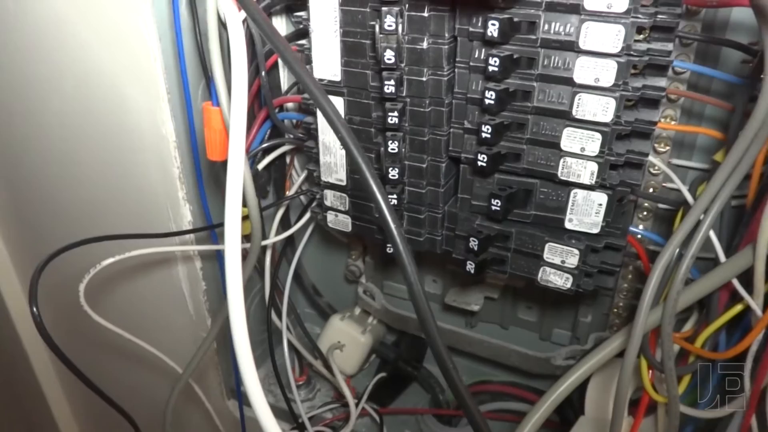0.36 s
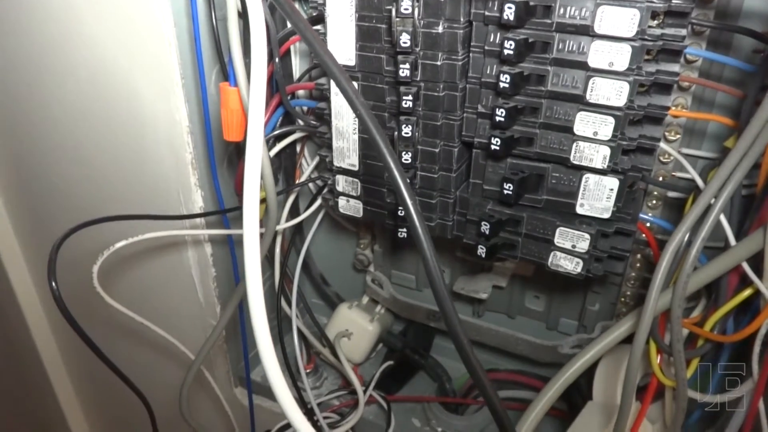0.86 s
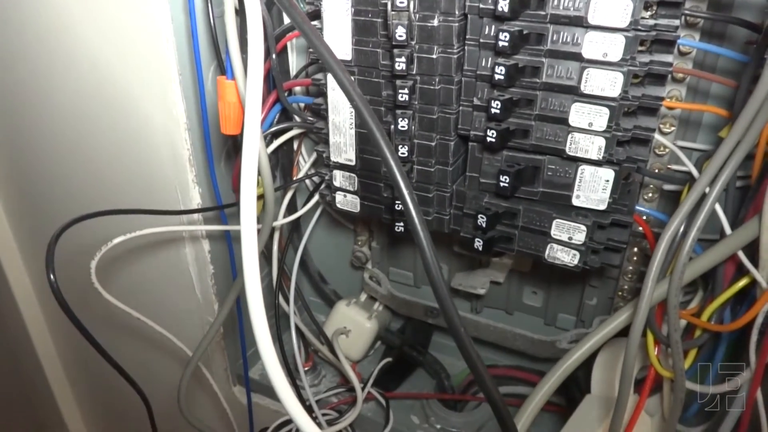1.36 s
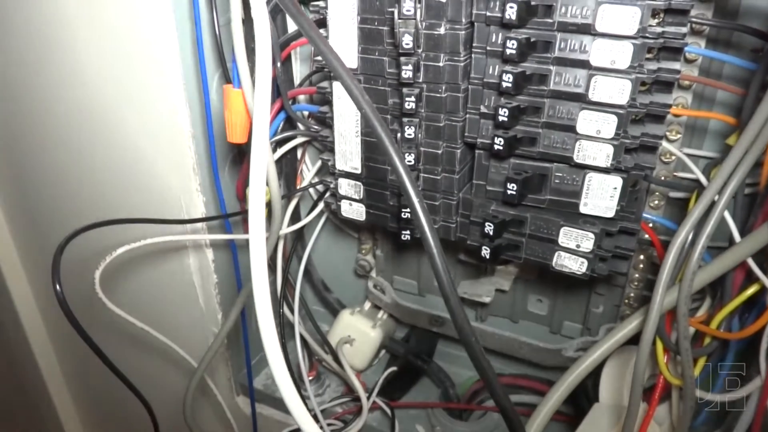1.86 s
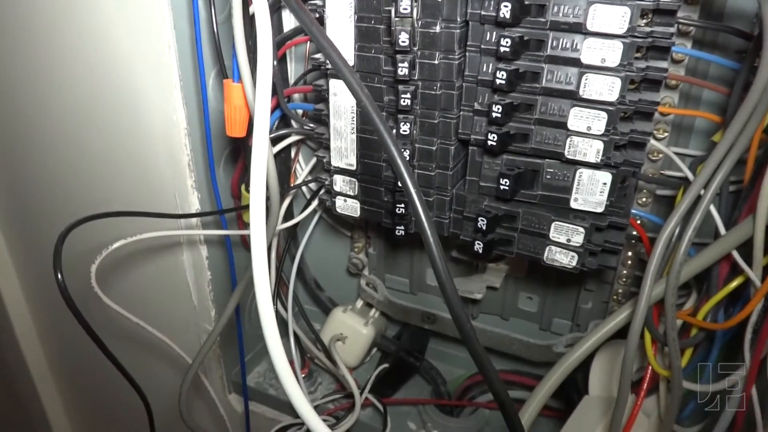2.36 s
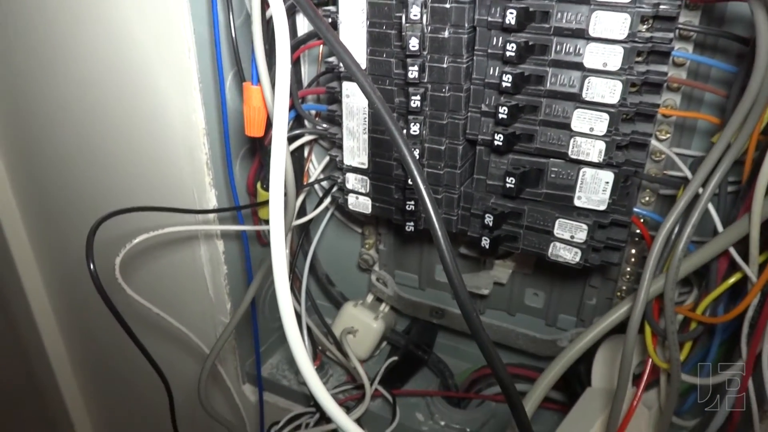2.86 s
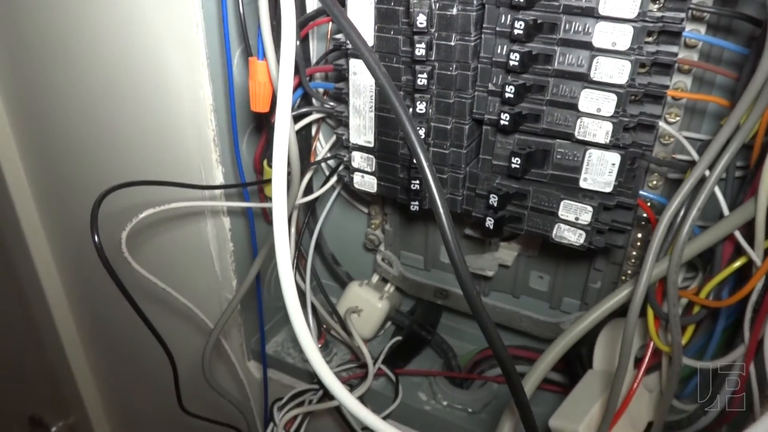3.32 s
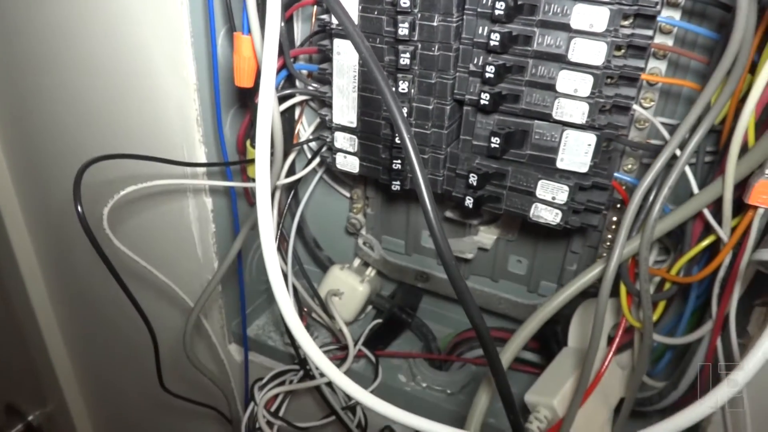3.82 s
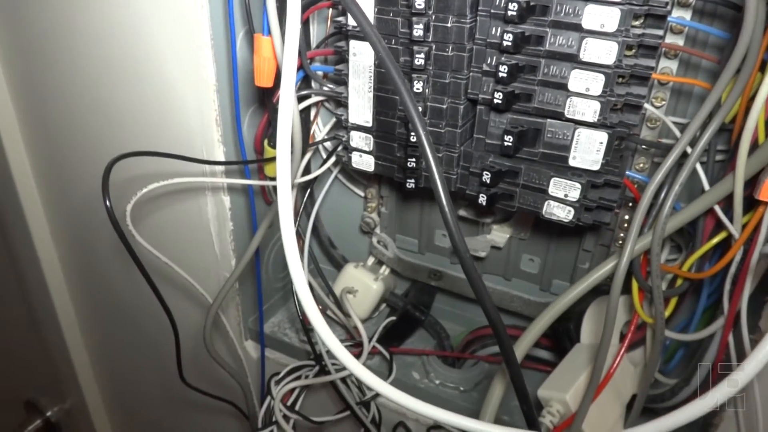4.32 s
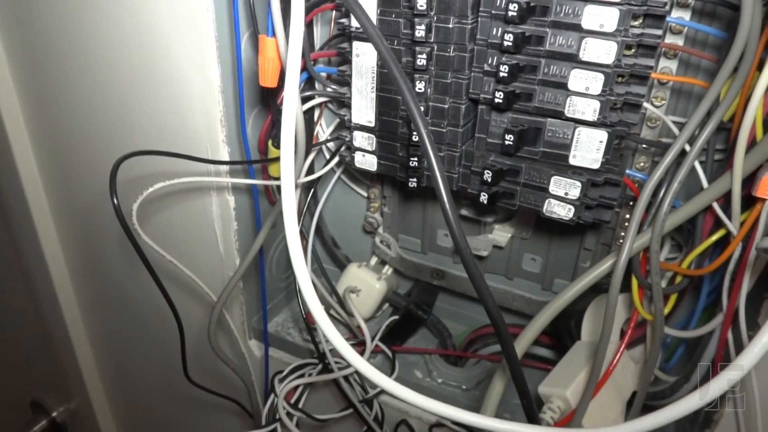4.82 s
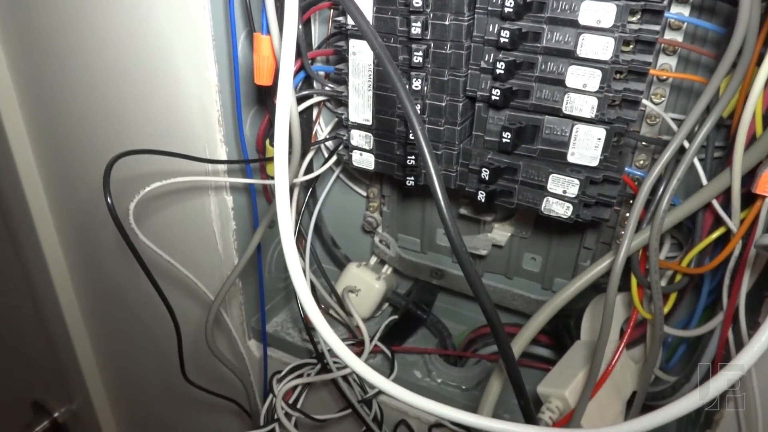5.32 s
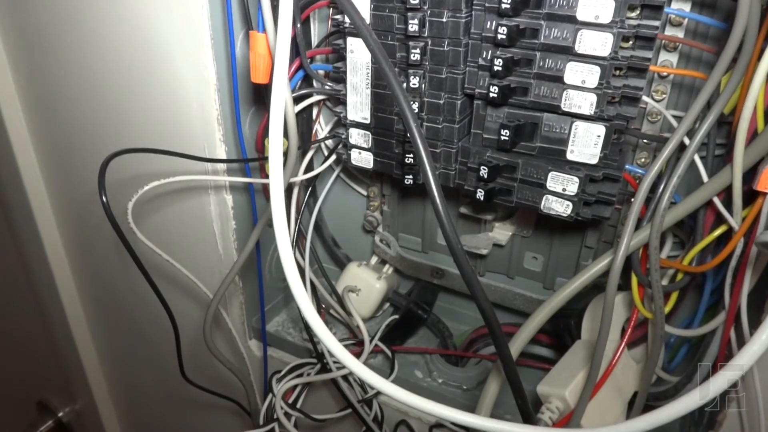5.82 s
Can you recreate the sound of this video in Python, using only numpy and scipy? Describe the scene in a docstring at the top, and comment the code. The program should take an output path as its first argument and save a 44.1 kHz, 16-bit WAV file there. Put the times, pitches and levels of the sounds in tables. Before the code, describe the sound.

Dry wire sleeves hiss and catch in short uneven strokes, with light plastic ticks and low hollow bumps from a metal panel. Activity starts brisk, thins out around two seconds, becomes steady rustling after three, and finishes with the loudest cluster of clacks. Close microphone, small indoor room with a short tail, quiet appliance hum and thin high whine behind.

```python
"""Wires in a breaker box

A hand moves insulated wires inside a steel breaker box in a quiet home, close to a small microphone.
Sleeves slide and scrape: noise made of tiny slips, shaped by strokes, wandering bands and sudden catches.
The bundle bumps as low hollow noise; wires and plastic parts tick and knock as decaying modes of the box.
Under it lie a soft appliance hum of filtered noise with hollow resonances and a thin whine of sines."""
import sys
import numpy as np
from scipy import signal
from scipy.fft import rfft, irfft
from scipy.io import wavfile
from scipy.ndimage import uniform_filter1d

SR = 44100
rng = np.random.default_rng(int(sys.argv[2]) if len(sys.argv) > 2 else 0)


def waveform_to_disk(signal):
    """Save audio, clipped to [-1, 1], as 16-bit WAV at the path in sys.argv[1]."""
    frames = np.transpose(np.atleast_2d(signal))
    scaled = np.clip(frames, -1, 1) * 32767
    samples = np.round(scaled).astype(np.int16)
    wavfile.write(sys.argv[1], SR, samples)


def ratio(d):
    """dB to gain"""
    e = np.asarray(d, float) / 20
    return 10 ** e


N = 272538  # length in samples


def level(x, db):
    """Scale to an rms level in dB."""
    return x * ratio(db) / np.sqrt(np.mean(x ** 2))


def colour(x, points):
    """Filter by (Hz, dB) points joined on a log frequency axis; silent outside them."""
    hz, db = np.transpose(points)
    f = np.maximum(np.fft.rfftfreq(x.shape[-1], 1 / SR), 1)
    gain = ratio(np.interp(np.log(f), np.log(hz), db, left=-90, right=-90))
    return irfft(rfft(x) * gain, x.shape[-1])


def walk(rate):
    """Random levels held for 1 / rate seconds and slewed twice."""
    hold = int(SR / rate)
    steps = np.repeat(rng.standard_normal(N // hold + 1), hold)
    return uniform_filter1d(uniform_filter1d(steps, hold), hold)[:N]


# Colour of the broad house hum: f/Hz, level/dB per Hz (relative)
HUM_COLOUR = [(76, -80), (130, -59), (214, -6.5), (631, -4), (852, -6), (1020, -10.5), (1220, 1.5),
              (2270, -23), (3010, -21), (4140, -44), (12700, -44), (14000, -7.5), (15500, -35)]
# Level of the deep rumble, before the hum dip: t/s, level/dB
RUMBLE_LEVEL = [(0.0, -71.5), (0.2, -79), (1.25, -77), (1.8, -79.5), (3.75, -77), (4.25, -89), (4.85, -94),
                (5.1, -90), (5.8, -75), (6.18, -79.5)]
# Hollow resonances in the hum, before waver and dip: f/Hz, width/Hz, level/dB rms
HUM_RESONANCES = [(228.5, 190, -65), (861, 15, -75.5), (1285, 106, -67.5), (2920, 650, -73),
                  (3560, 210, -82.5), (13200, 1260, -81), (14650, 680, -75.5)]
# The hum and rumble dip for a moment: t/s, gain level/dB
HUM_DIP_LEVEL = [(4.2, 0.5), (4.6, -1.5), (4.75, -1), (5.0, 1.5)]
# Whine lines, before their slight waver: f/Hz, level/dB rms
WHINE_LINES = [(13486.5, -70), (13906, -77), (13065, -86)]
# Left-right difference of the hum and rumble: f/Hz, gain level/dB
HUM_WIDTH = [(60, -21), (110, -12), (200, -18.5), (380, -5), (700, -4.5), (1290, -4.5), (2380, 3),
             (4400, -10), (8120, 1), (15000, -16.5)]


def house():
    """Broad hum over a deep rumble, wavering hollow resonances and nearly steady whine lines."""
    t, f = np.arange(N) / SR, np.fft.rfftfreq(N, 1 / SR)
    # row 0 is the middle, row 1 the left-right difference
    hum = level(colour(rng.standard_normal((2, N)), HUM_COLOUR), -59.5)
    deep = colour(rng.standard_normal((2, N)), [(15, -16), (40, 1), (95, 2), (150, -14)])
    hum = hum + level(deep, 0) * ratio(np.interp(t, *np.transpose(RUMBLE_LEVEL)))
    for hz, width_hz, db in HUM_RESONANCES:
        resonance = 1 / (1 + (2 * (f - hz) / width_hz) ** 2) ** 1.61
        band = irfft(rfft(rng.standard_normal((2, N))) * resonance, N)
        hum = hum + level(band, db) * ratio(0.3 * walk(5.5))
    hum = hum * ratio(np.interp(t, *np.transpose(HUM_DIP_LEVEL)))
    whine = 0
    for hz, db in WHINE_LINES:
        whine = whine + np.sqrt(2) * ratio(db + 0.62 * walk(8)) * np.sin(2 * np.pi * hz * t)
    return hum[0] + whine + colour(hum[1], HUM_WIDTH) * np.array([[1], [-1]])


def room(x):
    """A short diffuse tail, different at each ear, with the treble fading sooner."""
    t60_s, treble_t60_s, mid_db, wide_db = 0.37, 0.089, -12, -15
    t = np.arange(SR // 2) / SR
    noise = rng.standard_normal((2, len(t)))
    dull = signal.lfilter([.25], [1, -.75], noise)
    tail = dull * ratio(-60 * t / t60_s) + 0.75 * noise * ratio(-60 * t / treble_t60_s)
    tail = tail * np.minimum(t / 0.002, 1) / np.sqrt(np.sum(tail[0] ** 2))
    mid, side = signal.fftconvolve(x[None], tail, axes=1)[:, :N]
    side = colour(side, [(10, -14.5), (500, -13.5), (4000, 0.5), (9000, 4), (20000, -10.0)])
    return x + ratio(mid_db) * mid + ratio(wide_db) * side * np.array([[1], [-1]])


# Colour of sleeve hiss, shared by the cracks of the hits: f/Hz, level/dB per Hz (relative)
SLEEVE_COLOUR = [(1200, -26), (2500, -6), (4000, -1.5), (6000, -3.5), (9000, -3), (12000, -4), (14500, -12),
                 (15800, -18)]
# Ring of the box and its plastic parts: f/Hz, level/dB
BOX_MODES = [(195, -12), (272, 0), (350, -25), (488, 6.5), (630, -21.5), (696, 4), (820, 4), (985, -3),
             (1179, -28), (1250, 12), (1335, 17), (1500, 2), (1655, 15), (1865, 9), (2137, 13), (2218, -8),
             (2350, 19), (2562, 17), (2835, 22), (2945, 14.5), (3133, 19), (3430, 19), (3822, -29.5),
             (4750, -4), (5100, -17), (5500, -15), (6700, -2), (7700, 5), (9300, 15)]
# Ticks and knocks: t/s, peak level/dB before the crack, centre f/Hz, spread/octaves,
# crack starting level/dB rms re peak
KNOCKS = [(0.002, -34.5, 1970, 1.1, -18), (0.123, -32, 1860, 1.76, -7.5), (0.145, -40.5, 2180, 1.3, -10),
          (0.256, -36.5, 5250, 2.4, -1), (0.285, -57, 1280, 1.8, -10), (0.530, -16.5, 2780, 0.74, -8.5),
          (0.962, -28.5, 2800, 0.83, -26), (1.208, -32, 412, 1.05, -25), (1.66, -37.5, 2720, 1.6, -19),
          (1.699, -26.5, 2760, 1.4, -9.5), (2.412, -31.5, 840, 1.32, -28), (2.884, -35.5, 1130, 1.7, -19),
          (3.061, -33.5, 603, 1.8, -29), (3.639, -49, 2430, 1.5, -20), (3.714, -37, 3250, 1.5, -6),
          (3.957, -44, 8700, 1.7, -18), (4.035, -32, 460, 1.34, -10), (4.077, -39, 2070, 1.3, -13),
          (4.805, -52, 2980, 1.1, -18), (5.344, -23, 3280, 1.6, -6), (5.519, -19, 710, 1.63, -26),
          (5.526, -21, 487, 1.43, -45), (5.617, -39, 872, 1.5, -29), (5.777, -21, 510, 1.35, -22),
          (5.827, -30, 1290, 0.63, -21), (5.902, -24, 460, 1.7, -25), (5.927, -11, 3060, 0.64, -29),
          (5.935, -12, 2280, 0.45, -36), (5.945, -15, 1930, 0.64, -35), (5.987, -32.5, 2330, 1.2, -5.5),
          (6.111, -28, 1620, 1.8, 0)]
# Hollow taps that sound mostly one pitch: t/s, peak level/dB before the crack, f/Hz, ring t60/s
HOLLOW_TAPS = [(0.318, -35, 1658, 0.05), (0.396, -38, 1800, 0.033), (0.604, -32, 2440, 0.036),
               (1.182, -31.5, 275, 0.077), (1.705, -36.5, 660, 0.029), (2.147, -41, 828, 0.11),
               (2.421, -28.5, 846, 0.1), (2.444, -29.5, 840, 0.051), (3.311, -39, 1220, 0.06),
               (3.403, -44, 1600, 0.14), (3.455, -36, 1350, 0.052), (3.838, -44, 1420, 0.06),
               (3.882, -40.5, 1550, 0.041), (3.909, -42, 1130, 0.085), (4.883, -40.5, 1460, 0.04),
               (4.923, -34, 1526, 0.066)]


def hits():
    """Each blow is a first contact and a short rattle; it rings the modes near its centre pitch and cracks."""
    t60_at_1khz_s, t60_power = 0.078, -0.33  # lower knocks ring longer
    tap_spread_octaves, tap_crack_db = 0.21, -44
    out, t = np.zeros(N + SR), np.arange(SR // 3) / SR
    mode_hz, mode_db = np.transpose(BOX_MODES)
    f = np.geomspace(150, 16000, num=24)
    blows = [(s, peak, centre, t60_at_1khz_s * (centre / 1000) ** t60_power, spread, crack)
             for s, peak, centre, spread, crack in KNOCKS]
    blows += [(*tap, tap_spread_octaves, tap_crack_db) for tap in HOLLOW_TAPS]
    chance = rng.standard_normal((len(blows), 3, len(t)))
    for blow, (mode_noise, rattle_noise, crack_noise) in zip(blows, chance):
        s, peak_db, centre_hz, t60, spread, crack_db = blow
        spread, t60 = max(spread, .15), max(t60, .008)
        share = ratio(mode_db - 7.8 * (np.log2(mode_hz / centre_hz) / spread) ** 2)
        share = share * np.sign(mode_noise[:len(mode_hz)])
        decay = np.log(1000) / t60 * (mode_hz / centre_hz) ** 0.61  # high modes die first
        ring = share @ (np.exp(-np.outer(decay, t)) * np.sin(2 * np.pi * np.outer(mode_hz, t)))
        # the struck part adds its own pitch, clearest in hollow taps
        own_pitch = np.sin(2 * np.pi * centre_hz * t) * ratio(-60 * t / (.8 * t60))
        ring = ring + 1.04 / spread * own_pitch
        contact = 0.088 * rattle_noise ** 3 * np.exp(-t / (0.077 * t60))
        contact[0] = 1
        ring = signal.fftconvolve(contact, ring)[:len(t)]
        # the many weak modes of sheet and plastic blur into a decaying clatter, broader in colour
        octaves = np.log2(f / centre_hz) / spread
        slope_db = np.where(octaves > 0, -7 * octaves - 1.3 * octaves ** 2, 11 * octaves)
        clatter = colour(mode_noise, np.c_[f, slope_db])
        swell = np.minimum(t / 0.0027, 1) * ratio(-60 * t / t60)
        body = ring / np.abs(ring).max() + ratio(-5.0) * spread * clatter / clatter.std() * swell
        # low blows crack duller
        crack = signal.lfilter([1], [1, -np.exp(-centre_hz / 900)], colour(crack_noise, SLEEVE_COLOUR))
        crack = level(crack, crack_db) * ratio(-60 * t / (.5 * t60))
        i = int(s * SR)
        out[i:i + len(t)] += ratio(peak_db) * (body / np.abs(body).max() + crack)
    # a steep high-pass keeps the deep bass out of the hits
    return signal.sosfilt(signal.butter(4, 170, "high", fs=SR, output="sos"), out[:N])


def slips(scatter_db):
    """A tiny slip at every sample, most faint, a few strong."""
    return rng.standard_normal(N) * ratio(scatter_db * rng.exponential(size=N))


def wander(x, lo_hz, hi_hz, depth_db, rate, count):
    """Narrow bands that each swell and fade alone, as contact points shift along the wire."""
    f, spectrum = np.fft.rfftfreq(N, 1 / SR), rfft(x)
    band = np.searchsorted(np.geomspace(lo_hz, hi_hz, num=count), f)
    return sum(irfft(spectrum * (band == k), N) * ratio(depth_db * walk(rate)) for k in range(count + 1))


def catches(rate, jump_db, fade_s):
    """The sleeve catches now and then: its level jumps at once and sinks back."""
    kicks = (rng.random(N) < rate / SR) * rng.random(N)
    return ratio(jump_db * signal.lfilter([1], [1, -np.exp(-1 / (fade_s * SR))], kicks))


# Slides, a wire drawn along another: start t/s, length/s, treble level/dB,
# mid body level/dB re treble, lift level/dB re treble above 7 kHz
WIRE_SLIDES = [(0.269, 0.052, -54, -9, -2), (0.548, 0.055, -39, -10, -2), (0.646, 0.083, -64, 2, -2),
               (0.728, 0.1, -54.5, -9, -1), (0.817, 0.066, -60, -2, 1.5), (0.912, 0.056, -64, 7, 2),
               (0.955, .1, -35, -6.5, -2), (1.093, 0.079, -37, -13.5, -0.5), (1.257, 0.11, -42.5, -12, -2),
               (1.477, .09, -55.5, -5, 3.5), (2.195, .04, -82, 19, -12), (2.452, 0.048, -42, -2.5, -11),
               (2.993, 0.096, -46.5, 0.5, -8.5), (3.077, 0.068, -53.5, 7, -8),
               (3.124, 0.12, -41.5, -3, -6.5), (3.187, 0.12, -42, -2, 2), (3.398, 0.047, -47, 0.5, 2),
               (3.466, 0.15, -44, -1, 0.5), (3.595, 0.066, -47.5, 2, -1.5), (3.69, 0.12, -42.5, -6.5, -0.5),
               (3.782, 0.084, -50, -2, 4), (3.858, 0.084, -50, -2, 2.5), (4.023, 0.068, -38, 0, 1.5),
               (4.084, .1, -42.5, -1, -2.5), (4.19, 0.074, -54, 0.5, -1), (4.248, 0.099, -56.5, -1.5, 4.5),
               (4.34, 0.096, -61, 0, 9), (4.683, 0.046, -61.5, -16, -17), (4.769, 0.13, -53.5, 4, 0.5),
               (4.834, .04, -56.5, -3, 7), (4.881, 0.091, -46.5, -3, 1), (4.994, 0.059, -59, -2, 4),
               (5.065, 0.078, -51.5, -0.5, 3), (5.129, 0.13, -39.5, -4.5, 4), (5.222, 0.055, -43.5, 0.5, 5),
               (5.821, 0.037, -45.5, 3, -8), (6.016, 0.068, -48, -1.5, 3), (6.106, 0.048, -34, -2, -4)]
# Scrapes, a wire that springs free and settles: t/s, fade t60/s, treble level/dB,
# mid body level/dB re treble, lift level/dB re treble above 7 kHz
WIRE_SCRAPES = [(0.0, 0.36, -47, 1.5, -5), (0.128, 0.57, -58, 4, 2.5), (0.318, 0.24, -60, 0, -9),
                (0.345, .8, -69, 13, -1), (0.395, 0.33, -57, 4.5, -14), (0.465, 0.58, -64, 9.5, -5),
                (0.532, 0.22, -36, -7, -2), (1.199, 0.4, -53, 4, -4), (1.39, 0.79, -54.5, -9, 0.5),
                (1.58, 1, -58.5, -6, 2.5), (1.706, 0.27, -44.5, -5.5, -6), (1.8, 0.54, -74.5, -6, 9),
                (2.148, 0.21, -76, 26.5, -13), (2.414, 0.17, -44, 1.5, -32), (2.53, 0.55, -62, 4, -3),
                (2.702, 0.64, -78.5, 6, 6), (2.828, 0.065, -77.5, 6, 13), (2.887, 0.34, -42, -3.5, -9.5),
                (3.31, 1.0, -44, -4, 1.5), (3.555, 0.27, -49.5, -7, 6.5), (3.67, 0.48, -53.5, 2.5, -6),
                (3.957, 0.66, -53, -3.5, 8), (4.45, 0.44, -64.5, 5, 11.5), (4.63, 0.63, -70.5, -17, 3),
                (5.295, 0.27, -40.5, -1.5, 2), (5.344, 0.27, -37, -4, -2), (5.42, 0.47, -54, -1.5, 3.5),
                (5.48, 0.34, -51.5, -1.5, 1), (5.52, 0.24, -41, 6, -13), (5.617, 0.31, -56.5, 14, -6),
                (5.732, 0.97, -60, 5, -1), (5.781, 0.17, -40, 8, -0.5), (5.898, 0.25, -46.5, 8.5, 1),
                (5.928, 0.24, -33.5, 5, -17), (5.97, 0.19, -47, 5, -3)]
# Soft bumps of the cable bundle that shake the hollow box: t/s, fade t60/s, level/dB
BUNDLE_BUMPS = [(0.0, 0.28, -47.5), (0.602, 0.18, -49), (2.143, 0.2, -45), (2.416, 0.49, -48.5),
                (2.89, 0.36, -51.5), (3.058, 0.47, -43), (4.033, 0.3, -45), (5.519, 0.23, -33),
                (5.62, 0.47, -50), (5.778, 0.27, -36), (5.83, .3, -50), (5.902, 0.16, -41),
                (6.113, .4, -52)]


def strokes():
    """Each stroke rises, sags while the hand moves and fades; levels of treble, body, hollow and lift."""
    rise_share, rise_db, sag_db_per_s, slide_fade_s = 0.36, 13, 44, 0.15
    scrape_rise_s, bump_rise_s = 0.0046, 0.0077
    hollow_db, hollow_per_body = -17, 0.68  # heavier contact shakes the hollow box more
    t, power = np.arange(N) / SR, np.full((4, N), 1e-18)
    rows = [(s, rise_share * length, length, slide_fade_s, *levels) for s, length, *levels in WIRE_SLIDES]
    rows += [(s, scrape_rise_s, scrape_rise_s, fade, *levels) for s, fade, *levels in WIRE_SCRAPES]
    for s, rise, length, fade, db, body_db, lift_db in rows:
        part = slice(int(s * SR), int((s + length + fade) * SR))
        u = t[part] - s
        shape_db = (-rise_db * np.clip(1 - u / rise, 0, 1) - sag_db_per_s * np.clip(u, 0, length)
                    - 60 * np.maximum(u - length, 0) / fade)
        layers_db = np.array([0, body_db, hollow_db + hollow_per_body * body_db, lift_db])
        power[:, part] += np.outer(ratio(layers_db), ratio(db + shape_db)) ** 2
    for s, fade, db in BUNDLE_BUMPS:
        u = np.maximum(t - s, 0)
        power[2] += (np.minimum(u / bump_rise_s, 1) * ratio(db - 60 * u / fade)) ** 2
    return np.sqrt(power)


# Colour of the shaken wire bundle: f/Hz, level/dB per Hz (relative)
BODY_COLOUR = [(600, -14), (1100, -7), (1400, -2.5), (2000, -4), (2900, -3.5), (3600, -13.5), (5000, -49.5)]
# Colour of the shaken hollow box: f/Hz, level/dB per Hz (relative)
HOLLOW_COLOUR = [(120, -25), (220, -1.5), (450, -2), (800, 3), (1200, -33)]


def rubbing():
    """Slips hiss off the sleeves and shake the wire bundle and the hollow box; the grip stutters."""
    treble, mid, low, lifted = strokes()
    grip = ratio(1.44 * walk(45))
    sleeve = wander(colour(slips(2.1), SLEEVE_COLOUR), 2500, 14000, 2.3, 14, count=26)
    sleeve = level(sleeve, 0) * catches(90, 6.3, 0.0024)
    # dry, fast slides hiss higher
    air = colour(sleeve, [(4500, -35), (7000, -7), (9500, -0.5), (20000, 2)])
    body = wander(colour(slips(2.64), BODY_COLOUR), 900, 4000, 2.2, 14, count=16)
    body = level(body, 0) * catches(62, 3.4, 0.0027)
    hollow = level(colour(slips(0.98), HOLLOW_COLOUR), 0)
    return grip * (treble * sleeve + (lifted - treble) * air + mid * body + low * hollow)


def scene():
    """Hand sounds in the room over the house hum."""
    return room(rubbing() + hits()) + house()


def band_limit(x):
    """A steep low-pass at the top of the band."""
    return signal.sosfilt(signal.butter(12, 16490, fs=SR, output="sos"), x)


def record(dry):
    """The recorder cuts the top above 15.7 kHz with a steep low-pass."""
    thin = signal.sosfilt(signal.ellip(8, .3, 60, 15700, fs=SR, output="sos"), dry)
    return band_limit(thin)


dry = scene()
out = record(dry)
waveform_to_disk(out)
```